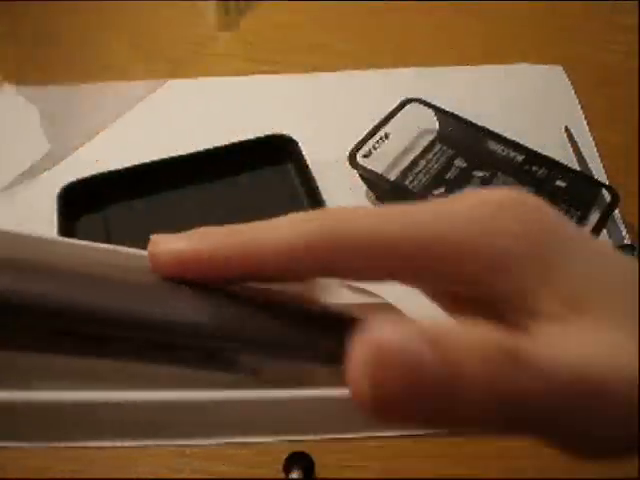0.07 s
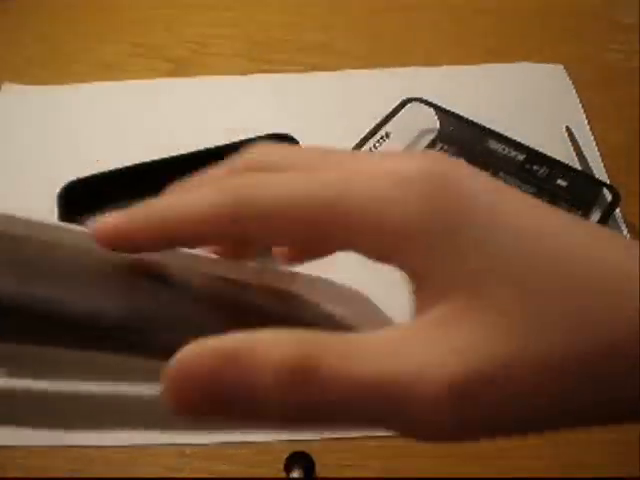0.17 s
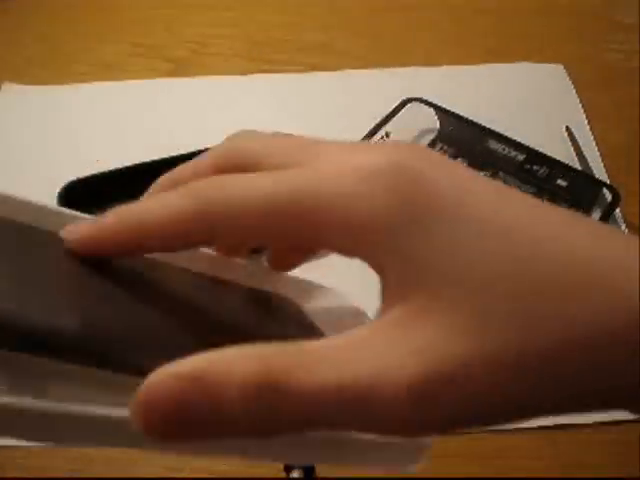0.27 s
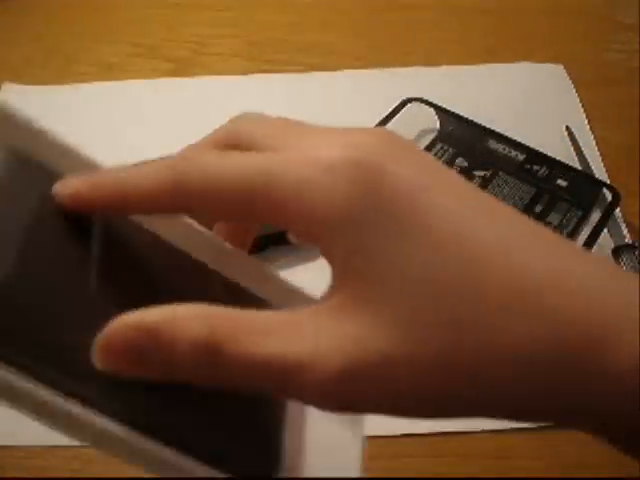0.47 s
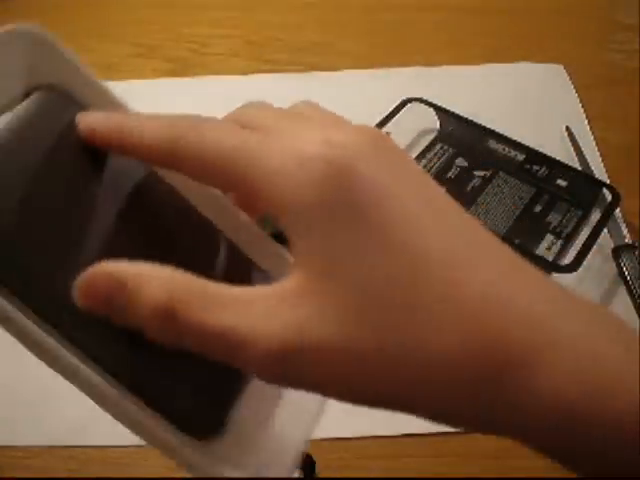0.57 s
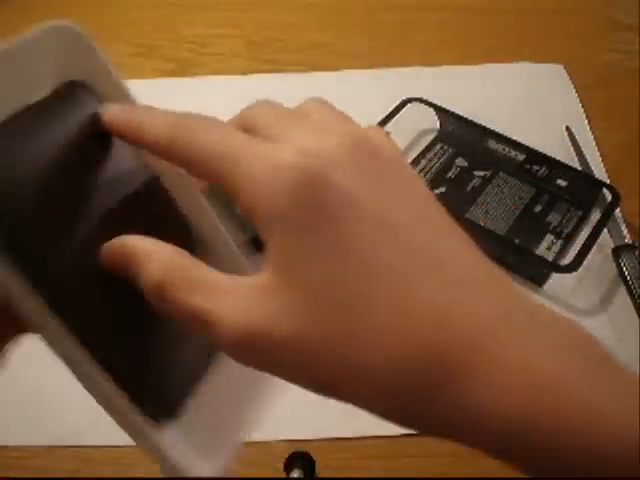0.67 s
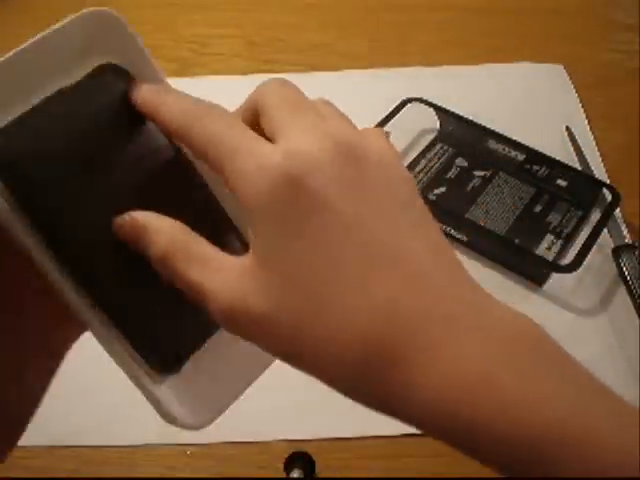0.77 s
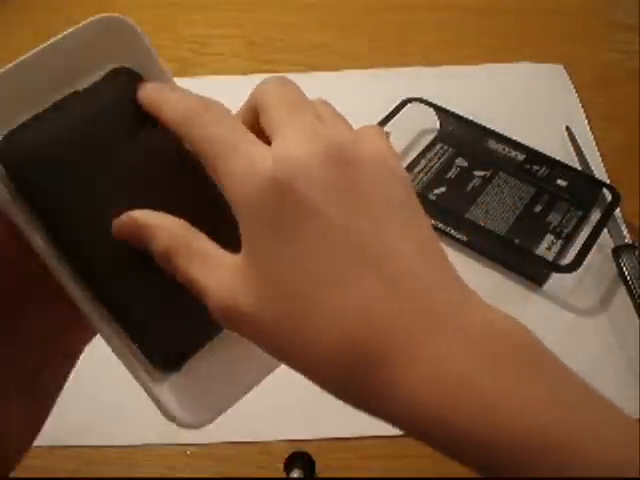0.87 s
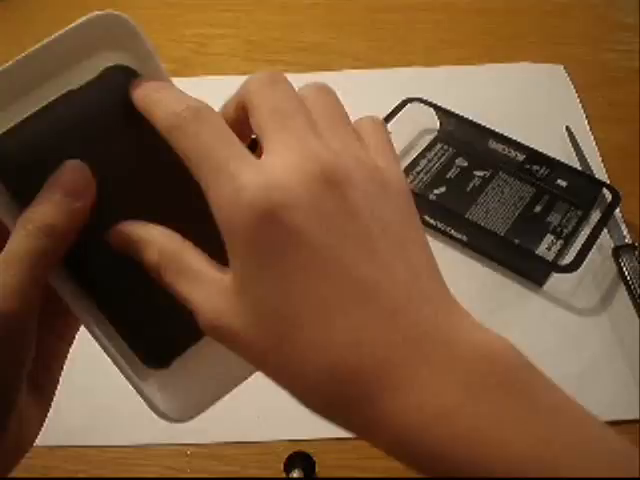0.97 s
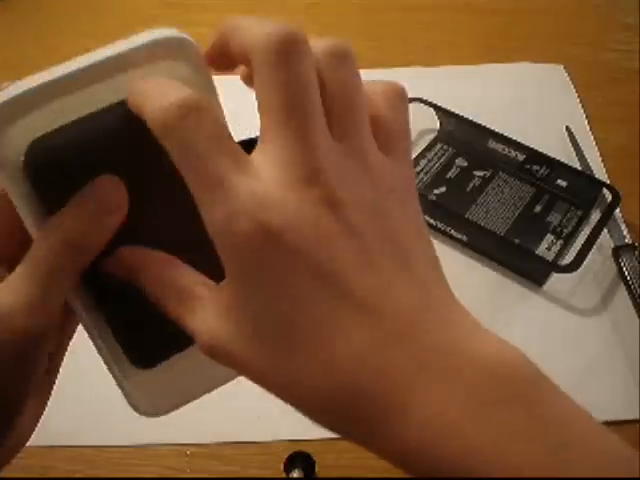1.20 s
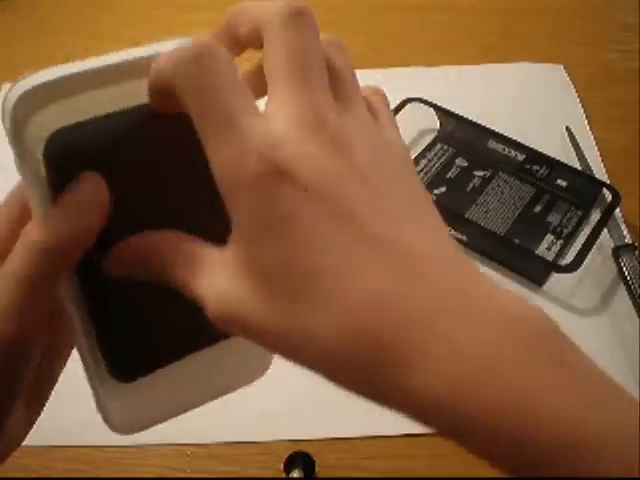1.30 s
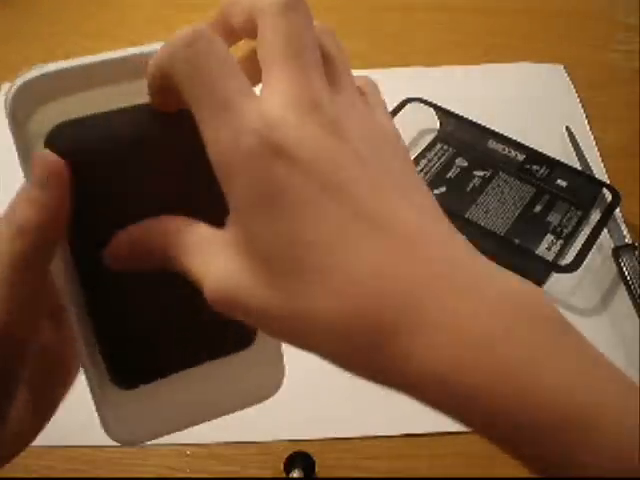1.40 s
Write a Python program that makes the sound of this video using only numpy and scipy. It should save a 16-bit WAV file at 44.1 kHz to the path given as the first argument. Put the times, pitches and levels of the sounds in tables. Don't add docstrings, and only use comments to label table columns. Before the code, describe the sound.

Hard plastic packaging popping, clicking and creaking in uneven bursts while being flexed by hand

```python
import sys
import numpy as np
from scipy import signal
from scipy.fft import rfft, irfft
from scipy.io import wavfile
from scipy.ndimage import map_coordinates

SR = 44100
rng = np.random.default_rng(int(sys.argv[2]) if len(sys.argv) > 2 else 0)


def magnitude_from_level(level_db):
    exponent = np.asarray(level_db, float) / 20
    return 10 ** exponent


def wrap_up_sound(samples):
    columns = np.atleast_2d(samples).T
    tamed = np.clip(columns, -1, 1)
    steps = np.round(tamed * 32767).astype(np.int16)
    wavfile.write(sys.argv[1], SR, steps)


N = 63945


def room_tone():
    # (frequency [Hz], level [dB per Hz])
    density = [(25, -2.5), (100, -8.5), (200, -2.5), (400, 0), (1500, -5), (3000, -6), (8000, -13)]
    hz = np.arange(N // 2 + 1) * SR / N + 1
    density_hz, density_db = np.array(density).T
    db = np.interp(np.log(hz), np.log(density_hz), density_db)
    hiss = irfft(rfft(rng.standard_normal(N)) * magnitude_from_level(db), N)
    return hiss / hiss.std() * magnitude_from_level(-48)


def fade(start, hold, decay_ms):
    t = np.arange(N) / SR - start
    onset = np.clip(t * 2000, 0, 1)
    return onset * np.exp(-np.clip(t - hold, 0, None) / (decay_ms / 1000))


def slips():
    slips_per_s, spread_db = 5000, 3.5
    happens = rng.random(N) < slips_per_s / SR
    size = magnitude_from_level(spread_db * np.minimum(rng.exponential(size=N), 4))
    x = happens * size * np.sign(rng.standard_normal(N))
    return x / x.std()


def shares(db, base_db, rim_db):
    return magnitude_from_level(db + np.array([base_db, 0, rim_db]))


def forces():
    # (time [s], level [dB], base minus wall [dB], rim minus wall [dB], chatter decay [ms])
    snaps = [(.1216, -28.5, 1, 1.5, 3.7), (.1902, -20.5, 7, 3.5, 1.8), (.2488, -11.5, 9, 5.5, 1.4),
             (.2584, -4.5, -19, -18, 1.6), (.4262, -11, -26, -17, 1.8), (.4357, -15, 1, -8, 1.9),
             (.4909, -29, -9, 10, 6), (.5521, -31.5, -6, 17.5, 4.5), (.5712, -11, 5, -4.5, 7.1),
             (.5966, -18.5, -1, 1.5, 4.7), (.6443, -25, -8, 7, 14), (.6553, -5, -1, 6.5, 2.5),
             (.6975, -8.5, 10.5, 11.5, 2.1), (.7484, -2.5, 5, -2, 2.2), (.7632, -15, -9, 1.5, 3.2),
             (.832, -20, -23, -3, 16), (.8833, -12, -16, 13, 4.1), (.9078, -1, -6, -6.5, 2.2),
             (.9212, -19.5, -6, 6.5, 2.2), (1.0337, -11.5, -30, 1.5, 3.7), (1.1143, -7, -8, -19.5, 6.1),
             (1.209, -24, -19, 4, 2.9), (1.2858, -2, -8, -15, 3.8), (1.3955, -22, -21, -4, 7.8)]
    # (time [s], level [dB], base minus wall [dB], rim minus wall [dB])
    ticks = [(0.133, -45, -10, 6), (0.15, -44, -10, 7), (.165, -48, -8, 1), (0.183, -22.5, 2, -12),
             (0.2642, -15, -10, -17), (.286, -20.5, -17, -11), (0.419, -32, -4, 3),
             (0.4999, -38.5, -12, 10.5), (.541, -30.5, -14, 8), (0.546, -34, -10, 12.5),
             (.575, -25, -15, -15), (.578, -18, -19, 4.5), (0.587, -30, -7, -14), (0.6746, -21, -10, -13),
             (0.715, -27, -6, 9), (0.949, -16, -13, -18), (1.0004, -27, -12, 6), (1.022, -19, -18, -17),
             (1.215, -27, 6, -8), (1.298, -17, -29, -20), (1.345, -24.5, -16, -29), (1.439, -20, -26, -9)]
    # (time [s], length [s], level [dB], rim minus wall [dB], base minus wall [dB])
    rasps = [(0.114, 0.008, -49.5, 3, -2), (0.198, 0.007, -25, 3, -18), (.207, 0.0098, -22.5, 8.5, -6),
             (0.226, 0.019, -23, -12, 1), (0.254, 0.029, -24.5, -29, 3), (0.426, 0.017, -26, -6, -5),
             (0.462, 0.005, -45, -7, -15), (0.513, 0.0049, -52, 9, -25), (0.568, 0.024, -29.5, -6.5, -7),
             (0.598, 0.04, -35, -4, 2.5), (0.663, 0.02, -19, -2.5, -9), (0.686, 0.0098, -28, 3, 9),
             (0.713, 0.019, -24.5, -2.5, 4), (0.736, 0.008, -33, 12, 5), (0.746, 0.02, -22.5, -7.5, -2),
             (0.763, 0.016, -33.5, -26, -6), (0.86, 0.01, -26, -22, 2), (0.884, 0.018, -27.5, -2, -18),
             (1.016, 0.024, -31, 6, -12), (1.036, 0.014, -21.5, 0, -33), (1.086, 0.018, -26, -5.5, -9),
             (1.207, 0.014, -37, 2, -15),]
    # (time [s], level [dB], rim minus wall [dB])
    crackle = [(0.1, -53.5, 16.5), (0.17, -39.5, 5.5), (0.317, -38.5, 4.5), (0.542, -46.5, -22),
               (0.788, -36.5, -4), (0.93, -23.5, -8), (1.198, -40.5, -1), (1.45, -41.5, -4)]
    chatter_db, tick_decay_ms, rasp_decay_ms, crackle_base_db = -5, 2.7, 3.9, -4

    times, blows, grip = [], [], np.zeros((3, N))
    for start, db, base_db, rim_db, decay_ms in list(snaps) + [(*row, tick_decay_ms) for row in ticks]:
        times.append(start)
        blows.append(shares(db, base_db, rim_db))
        chatter = shares(db + chatter_db, base_db, rim_db)
        grip += chatter[:, None] * fade(start, 0, decay_ms)
    for start, length, db, rim_db, base_db in rasps:
        grip += shares(db, base_db, rim_db)[:, None] * fade(start, length, rasp_decay_ms)

    t = np.arange(N) / SR
    at, db, rim_db = np.array(crackle).T
    differences = np.array([np.full(N, crackle_base_db), np.zeros(N), np.interp(t, at, rim_db)])
    pressure = magnitude_from_level(np.interp(t, at, db) + differences + 0.5)
    return np.array(times), np.array(blows).T, grip + pressure * (t > snaps[0][0])


def bend():
    wander_db, interval_s = 2, 0.018
    t = np.arange(N) / SR
    return magnitude_from_level(wander_db * np.interp(t / interval_s, np.arange(200), rng.standard_normal(200)))


def ring(force, hz, t60):
    radius = np.exp(-np.log(1000) / (t60 * SR))
    angle = 2 * np.pi * hz / SR
    gain = np.sin(angle) * np.sqrt(4 * (1 - radius))
    return signal.lfilter([gain], [1, -2 * radius * np.cos(angle), radius * radius], force)


def cut_lows(x):
    return signal.sosfilt(signal.butter(4, 328, "high", fs=SR, output="sos"), x)


def tray():
    # (frequency [Hz], level [dB], t60 [s])
    base = [(422, -9.5, 0.05), (647, -4.5, 0.064), (746, -9.5, 0.029)]
    # (frequency [Hz], level [dB], t60 [s])
    wall = [(1061, -18, 0.075), (1154, -13, 0.036), (1508, -5.5, 0.024), (1678, -6, 0.033),
            (1947, -3, 0.0067), (2540, -3.5, 0.0059), (6366, 1, 0.0035)]
    # (frequency [Hz], level [dB], t60 [s])
    rim = [(3268, 3, 0.0077), (3754, -0.5, 0.0053), (4276, -5.5, 0.0056), (4740, -4.5, 0.0059)]
    # (low edge [Hz], high edge [Hz], level [dB])
    cracks = [
        (863, 2240, 2.5),
        (3350, 6100, 1),
    ]
    blow_spread_db, crack_db, spike_db = 5.5, -4.5, -16

    times, blows, grip = forces()
    at = (times * SR).astype(int)
    slip = grip * slips()
    out = np.zeros(N)
    for part, modes in enumerate((base, wall, rim)):
        for hz, db, t60 in modes:
            force = slip[part] * (0.51 + rng.standard_normal(N) * 0.71)
            force[at] += 3 * blows[part] * magnitude_from_level(blow_spread_db * rng.standard_normal(len(at)))
            out += magnitude_from_level(db - 11.5) * ring(force * bend(), hz, t60)
    for part, (low_hz, high_hz, db) in enumerate(cracks, start=1):
        crack = slip[part].copy()
        crack[at] += 3 * blows[part]
        band = signal.sosfilt(signal.butter(2, [low_hz, high_hz], "band", fs=SR, output="sos"), crack)
        out += magnitude_from_level(crack_db + db) * band + magnitude_from_level(spike_db) * crack
    return cut_lows(out)


def lone_ring(start, hz, db, t60, attack_ms):
    age = np.clip(np.arange(N) / SR - start, 0, None)
    attack = np.clip(age * 1000 / attack_ms, 0, 1)
    return magnitude_from_level(db - 60 * age / t60) * np.sin(2 * np.pi * hz * age) * attack


def knocks():
    # (time [s], frequency [Hz], level [dB], t60 [s])
    bumps = [(.1215, 520, -30.5, 0.025), (0.209, 162, -41, 0.034), (0.2571, 1570, -5, 0.017),
             (.265, 600, -26.5, .1), (0.43, 486, -30.5, 0.049), (0.436, 1617, -24, 0.035),
             (0.452, 1565, -33, .06), (.572, 580, -26, 0.12), (1, 40, -56, .08), (0.5956, 3950, -12, 0.017),
             (0.653, 113.4, -34, 0.011), (.6555, 690, -14, 0.019), (.657, 3980, 1.5, 0.0083),
             (.699, 400, -39, 0.028), (0.7646, 436, -18, 0.086), (.7652, 612, -18, 0.05),
             (0.871, 299, -26.5, 0.041), (0.9092, 1970, -4.5, 0.024), (.91, 90, -45, 0.022),
             (1.396, 375.8, -27.5, 0.029)]
    return -sum(lone_ring(start, hz, db, t60, 3.1) for start, hz, db, t60 in bumps)


def pings():
    # (time [s], frequency [Hz], level [dB], t60 [s])
    lone_patches = [(.1216, 4440, -27.5, 0.018), (.132, 3800, -21, .012), (0.2478, 1770, -10.5, 0.0087),
                    (.249, 4500, -16, 0.0093), (.2695, 3360, -19, 0.0089), (.2697, 4680, -31, 0.0082),
                    (.4909, 3910, -24, .02), (.4912, 4320, -26, 0.022), (0.5512, 2650, -18, 0.017),
                    (.5524, 3690, -19, 0.018), (.5527, 4350, -18.5, 0.018), (0.554, 5400, -25, .012),
                    (.5533, 940, -30.5, 0.064), (0.5703, 1490, -16, 0.013), (.5746, 1180, -11.5, 0.0087),
                    (.5749, 1640, -17, 0.022), (.605, 617, -23.5, 0.033), (.6445, 2140, -15, .015),
                    (.645, 3840, -21, 0.014), (.6453, 4360, -20, 0.013), (.6975, 3430, -7.5, 0.014),
                    (.6977, 4600, -26, .012), (.7483, 1910, -2.5, 0.0052), (.7485, 2520, -10.5, 0.012),
                    (.7487, 1600, -14, .02), (0.7625, 1250, -7.5, 0.018), (0.7643, 3250, -24, .015),
                    (.7638, 1660, -21, 0.018), (.8831, 1863, -9.5, .025), (.8834, 3460, -22, 0.017),
                    (.9078, 1340, -12, 0.017), (1.0005, 1930, -28, 0.024), (1.0337, 2550, -14.5, 0.023),
                    (1.034, 3080, -11, 0.018), (1.037, 1990, -10.5, 0.014), (1.1142, 1480, -19, 0.026),
                    (1.1145, 1777, -26, 0.049), (1.2088, 1250, -17, .014), (1.2091, 3690, -32, 0.026),
                    (1.2094, 4440, -25, 0.017), (1.2857, 1840, -6.5, 0.0064), (1.2859, 2630, -19, 0.0042),
                    (1.2861, 6200, -18, 0.016), (1.2875, 1430, -14.5, 0.021), (1.297, 1696, -27.5, 0.033)]
    return cut_lows(sum(lone_ring(start, hz, db, t60, 0.51) for start, hz, db, t60 in lone_patches))


def squeaks():
    # (time [s], length [s], frequency [Hz], level [dB])
    rubs = [(0.195, 0.0124, 1410, -26.5), (0.2063, 0.013, 2770, -20), (.207, 0.008, 3150, -24.5),
            (0.2073, 0.0093, 3710, -29), (.208, 0.0089, 1190, -25), (0.2087, 0.0091, 5200, -21.5),
            (.213, .06, 1640, -28.5), (0.234, 0.0024, 1370, -22), (0.4244, .021, 1570, -27.5),
            (0.58, 0.013, 1610, -30), (0.6, 0.0089, 1700, -30.5), (0.659, 0.0228, 1840, -25.5),
            (.91, 0.054, 970, -37.5), (1.021, 0.01, 1100, -26), (1.038, 0.012, 1500, -22),
            (1.0387, 0.005, 4750, -27.5), (1.041, 0.022, 1020, -32), (1.088, 0.01, 1190, -27),
            (1.1, 0.0043, 1550, -32.5), (1.21, 0.0075, 2980, -37), (1.2105, .008, 5200, -42)]
    friction = rng.standard_normal(N)
    out = np.zeros(N)
    for start, length, hz, db in rubs:
        out += magnitude_from_level(db) * ring(friction * fade(start, length, 0.58), hz, 0.016)
    return cut_lows(out)


def drone():
    start_s, length_s, hz, db = 0.687, 0.11, 108, -48
    t = np.arange(N) / SR
    swell = np.sin(np.pi * np.clip((t - start_s) / length_s, 0, 1))
    return magnitude_from_level(db) * swell * np.sin(2 * np.pi * hz * t)


def desk_echo(direct):
    delay_ms, db = 1.111, -20
    return magnitude_from_level(db) * np.roll(direct, int(delay_ms * SR / 1000))


def room_tail(direct):
    t60_s, db = 0.28, -15
    t = np.arange(SR // 2) / SR
    tail = rng.standard_normal(len(t)) * magnitude_from_level(-60 * t / t60_s) * np.clip(t / 0.0013, 0, 1)
    tail = signal.lfilter([1], [1, -0.4], tail)
    tail *= magnitude_from_level(db) / np.sqrt(np.sum(tail ** 2))
    return signal.fftconvolve(direct, tail)[:N]


def scene():
    direct = tray() + pings() + squeaks()
    mix = direct + desk_echo(direct) + room_tail(direct)
    mix = mix + knocks() + drone() + room_tone()
    return mix[None]


def sample_and_hold(x):
    camera_rate, top_hz = 16000, 15700
    at = np.floor(np.arange(N) * camera_rate / SR) * SR / camera_rate
    held = np.clip(map_coordinates(x, [at], mode="mirror"), -1, 1)
    return signal.sosfilt(signal.ellip(8, 0.2, 60, top_hz, fs=SR, output="sos"), held)


def top_cut(x):
    return signal.sosfilt(signal.butter(12, 17000, fs=SR, output="sos"), x)


def record(dry):
    x = signal.sosfilt(signal.butter(4, 6160, fs=SR, output="sos"), dry[0])
    finished = sample_and_hold(x) - 0.0044
    return top_cut(finished[None])


dry = scene()
out = record(dry)
wrap_up_sound(out)
```